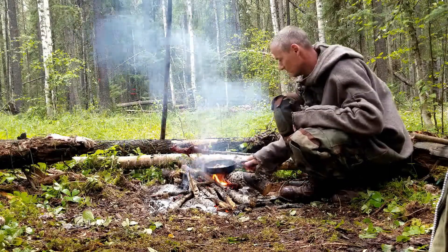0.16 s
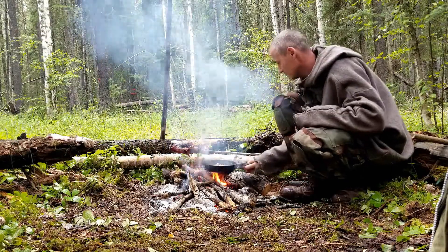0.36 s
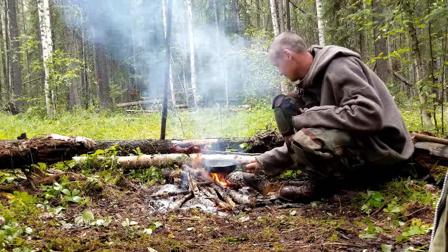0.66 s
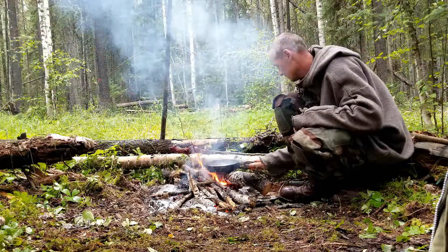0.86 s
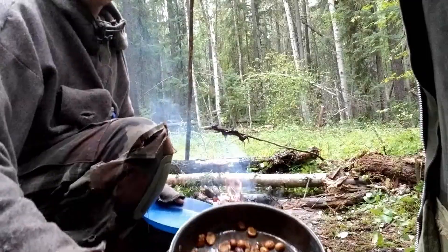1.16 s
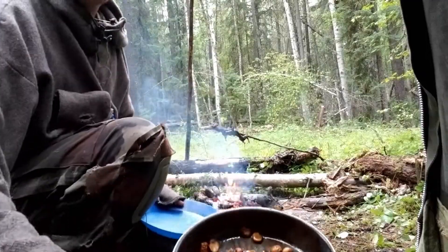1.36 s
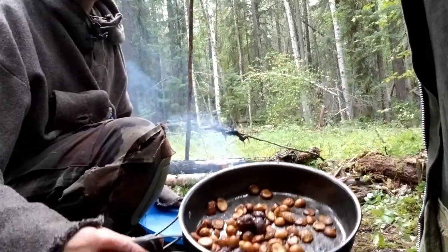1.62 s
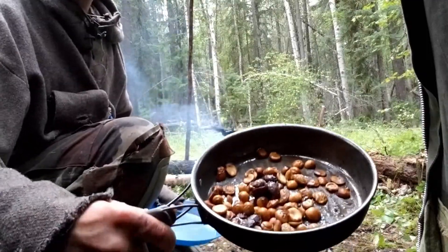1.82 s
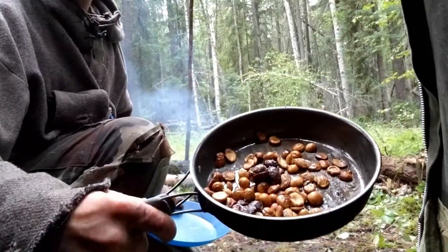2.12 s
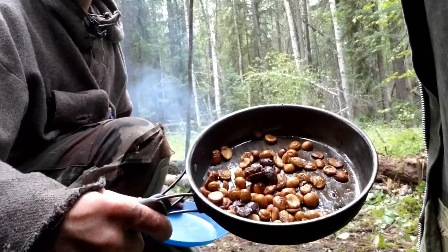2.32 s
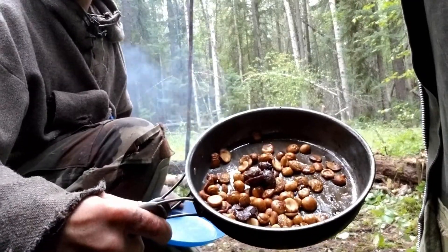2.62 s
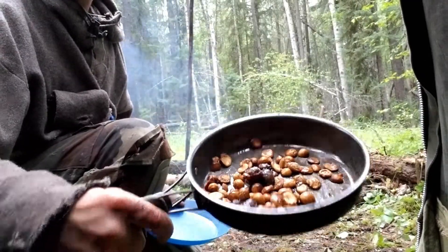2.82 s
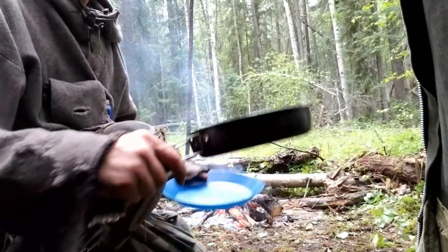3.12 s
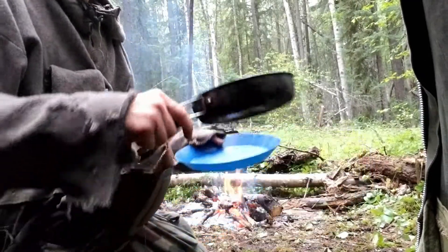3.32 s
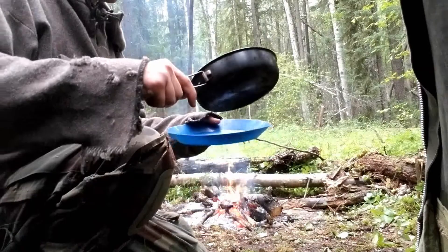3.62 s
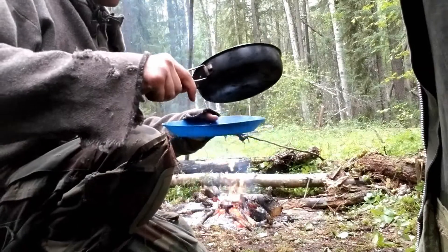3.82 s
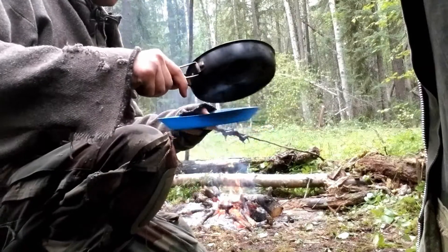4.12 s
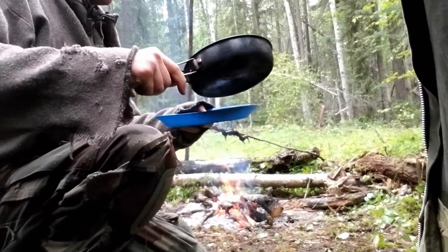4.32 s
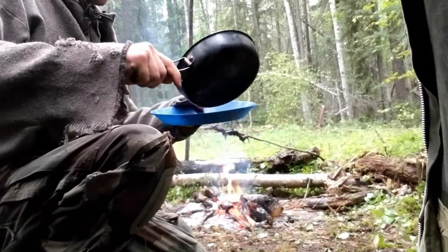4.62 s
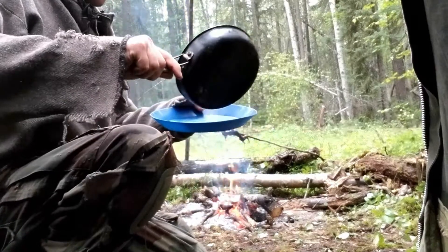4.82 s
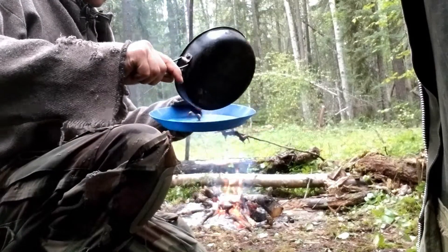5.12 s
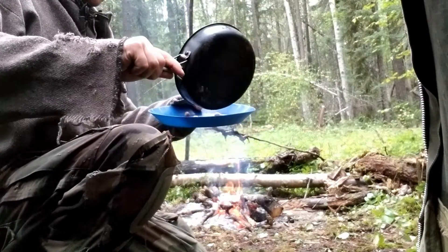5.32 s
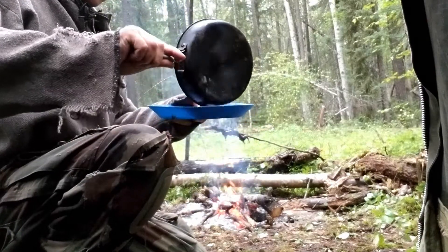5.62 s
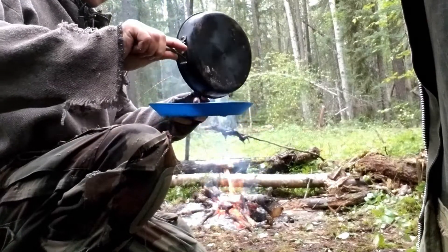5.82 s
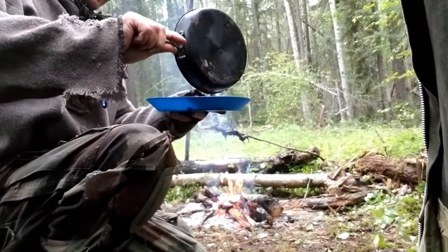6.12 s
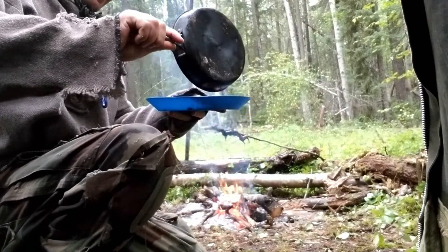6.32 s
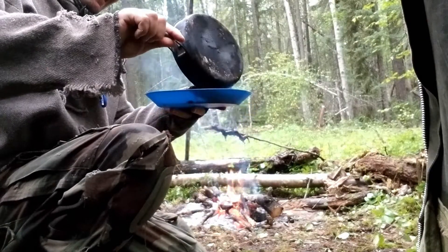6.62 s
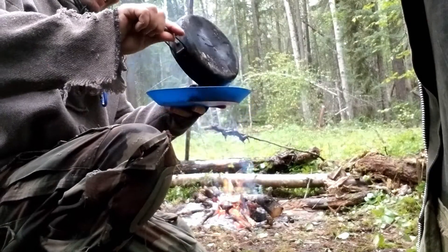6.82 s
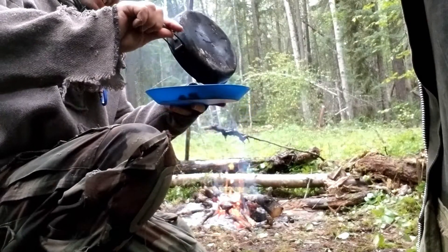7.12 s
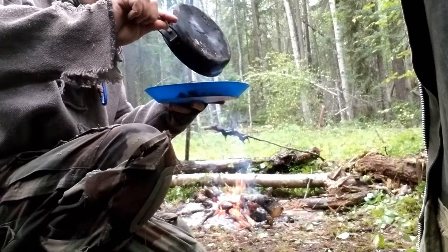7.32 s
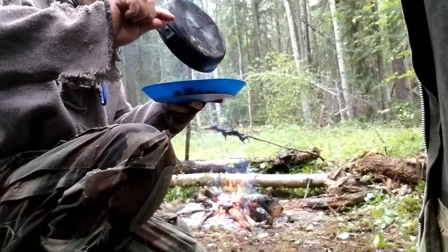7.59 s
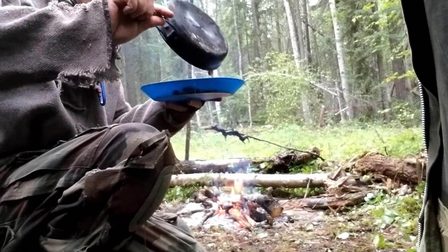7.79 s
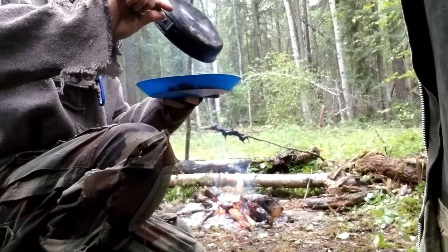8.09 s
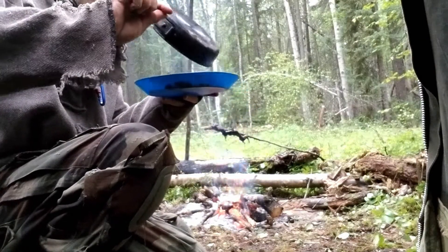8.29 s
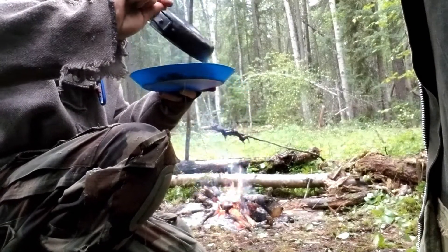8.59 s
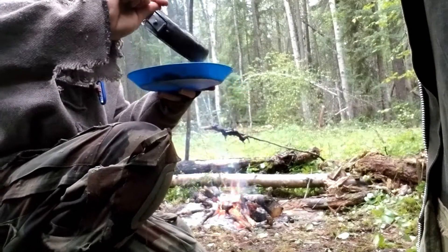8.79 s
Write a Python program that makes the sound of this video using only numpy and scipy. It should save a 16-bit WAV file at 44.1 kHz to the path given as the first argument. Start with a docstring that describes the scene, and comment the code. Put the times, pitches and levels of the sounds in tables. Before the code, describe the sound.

A campfire in a wood: low flutter, thin hiss, one loud snap at the very start. After a second the listening point jumps beside a tent, and a pan of fried mushrooms is shaken with short scraping slides. Pieces then tumble with dry knocks onto a plastic plate, thinning out while bright ember pops continue. Small stereo microphone, open air, faint pattering echoes from trees.

```python
"""Low fluttering flames and broad hiss run throughout, with sharp ember pops and pattering echoes from the start:
a campfire in a wood.
A small stereo microphone hears it from two positions; in the first, the left port is shielded from the fire.
From the second, near a tent, fried food slides in a metal pan and drops piece by piece onto a plastic plate.
Flames and hiss are shaped noise, pops are band-passed clicks, and pan and plate are resonant modes
driven by friction grains and contacts."""
import sys
import numpy as np
from scipy import signal
from scipy.fft import rfft, irfft
from scipy.io import wavfile

SR = 44100
rng = np.random.default_rng(int(sys.argv[2]) if len(sys.argv) > 2 else 0)


def master_out(mix):
    """Clip the mix to full scale and print it as 16-bit PCM to the path in sys.argv[1]."""
    frames = np.transpose(np.atleast_2d(mix))
    ceiling = np.clip(frames, -1, 1)
    pcm = np.round(ceiling * 32767).astype(np.int16)
    wavfile.write(sys.argv[1], SR, pcm)


N = 394694

MOVE_S = 1.108  # the listening position changes at once
PLATE_PAN_DB = 4  # left minus right

# metal pan modes: mode_hz, level_db, t60_s
PAN_MODES = [(622, 0, .075), (690, -10, .04), (1020, -8, .07), (1585, -11, .06), (2350, -15, .05),
             (2790, -15, .055), (3600, -19, .03), (7420, -16, .025)]
# plastic plate modes: mode_hz, level_db, t60_s
PLATE_MODES = [(466, -5, .02), (600, -4, .02), (738, -1, .025), (860, -4, .016), (1250, -3, .01),
               (1600, -4, .014), (1820, -4, .016), (2030, -5, .016), (2420, -1, .016), (2750, -2, .011),
               (3200, -3, .009), (3800, -5, .007), (4600, -6, .006)]


def amp(db):
    """Decibels to gain."""
    return 10 ** (np.asarray(db) / 20)


def rms_one(x):
    """Scale to unit rms."""
    return x / np.sqrt(np.mean(x ** 2) + 1e-20)


def peak_one(x):
    """Scale to unit peak."""
    return x / np.abs(x).max()


def in_time(rows):
    """Columns of a curve table, interpolated at every sample."""
    knot_s, *columns = np.transpose(rows)
    return [np.interp(np.arange(N) / SR, knot_s, column) for column in columns]


def sides(pan_db):
    """Left and right gains for a level difference, left minus right."""
    return amp(np.array([pan_db / 2, -pan_db / 2]))


def coloured(spectrum):
    """Two unrelated noises with the given spectrum, joint rms 1."""
    hz, level_db = np.transpose(spectrum)
    grid_hz = np.maximum(np.arange(N // 2 + 1) * SR / N, 1)
    gain = amp(np.interp(np.log(grid_hz), np.log(hz), level_db))
    white = rng.standard_normal((2, N))
    return rms_one(irfft(rfft(white) * gain, N))


def drift(knots_per_s):
    """Slow random curve through knots of standard deviation 1."""
    knots = int(N / SR * knots_per_s) + 2
    return np.interp(np.linspace(0, knots - 1, N), np.arange(knots), rng.standard_normal(knots))


def ring(x, hz, t60_s):
    """Two-pole resonator: a unit click starts a decaying sine of height about 1."""
    r, w = amp(-60 / (t60_s * SR)), 2 * np.pi * hz / SR
    return signal.lfilter([0, np.sin(w)], [1, -2 * r * np.cos(w), r * r], x + 1e-18)


def band(x, low_hz, high_hz):
    """Gentle band-pass."""
    return signal.sosfilt(signal.butter(2, [low_hz, high_hz], "band", fs=SR, output="sos"), x)


def add(out, start_s, sound):
    """Mix in a short sound, cut at the end of the scene."""
    at = int(round(start_s * SR))
    out[:, at:at + sound.shape[1]] += sound[:, :N - at]


def scatter(length, crest_s, t60_s, grain_db=1.5):
    """Envelope of many small returns: swells towards a crest, dies away, grainy."""
    t = np.arange(length) / SR
    lumps = np.repeat(rng.standard_normal((2, length // 24 + 1)), 24, axis=1)[:, :length]
    swell = .25 + .75 * (1 - np.exp(-(t / crest_s) ** 2))
    return swell * (t > .001) * amp(-60 * t / t60_s + grain_db * lumps)


def shield(s):
    """Left and right gains for direct fire sound: the left is shielded before the move."""
    shadow_db = -23
    return np.array([np.where(s < MOVE_S, amp(shadow_db), 1.), np.ones_like(s)])


def roar():
    """Flames flutter as low narrow noise, nearly the same at both ports."""
    # flames: time_s, level_db
    roar_curve = [(0.0, -49), (0.4, -55), (0.6, -49), (0.95, -54.5), (1.1, -53.5), (1.3, -53.5), (2.0, -55),
                  (2.9, -51), (2.99, -44.5), (3.09, -53), (4.76, -53.5), (4.86, -58.5), (5.0, -54),
                  (5.88, -51), (7.23, -52), (7.5, -55.5), (7.73, -52), (8.3, -51.5), (8.6, -55),
                  (8.95, -49.5)]
    # flame spectrum: freq_hz, density_db_per_hz
    roar_spectrum = [(15, -40), (30, -24), (42, -14), (57, 0), (70, -9), (82, -14), (93, -13), (106, -23),
                     (130, -24), (170, -37), (250, -37), (400, -50)]
    shared, own = coloured(roar_spectrum)
    own = band(own, 110, 400) * amp(-6.0)
    both = np.array([shared + own, shared - own]) * sides(4.1)[:, None]
    return amp(in_time(roar_curve)[0]) * both * shield(np.arange(N) / SR)


def hiss():
    """Steam from wood and fat: broad noise with faint random crackles."""
    # fire and fat at rest: time_s, level_db, lift_below_3500_hz_db
    hiss_curve = [(0.0, -61, 2), (0.17, -53.5, 2), (0.52, -57.5, -1.5), (0.68, -64, 3), (0.9, -59.5, 2),
                  (1.1, -62, -0.5), (1.35, -68.5, 4.5), (2.2, -74.5, 5.5), (2.52, -71.5, 3.5),
                  (2.62, -61.5, -6), (3.2, -63.5, 5), (3.35, -63, -3), (3.9, -69, 3.5), (4.7, -69.5, 3),
                  (5.6, -65.5, 9.5), (6.3, -67.5, 3.5), (7.3, -66, 0), (8.0, -69, 2.5), (8.12, -66.5, 6),
                  (8.47, -73, 5), (8.95, -67.5, 10)]
    # steam spectrum: freq_hz, density_db_per_hz
    hiss_spectrum = [(150, -4.5), (400, 8), (800, 8), (1600, 2), (3300, -0.5), (6000, 5), (11000, 0.5),
                     (16000, 8)]
    pan_before_db, pan_after_db = 1.5, 5.5  # left minus right, about the move
    level_db, lift_db = in_time(hiss_curve)
    # shaken fat spits
    level_db = level_db + sum(shape * rise_db for shape, (_, _, rise_db) in slide_shapes())
    pan_db = np.where(np.arange(N) / SR < MOVE_S, pan_before_db, pan_after_db)
    crackle_gain = amp(13 + 3.5 * rng.exponential(1, N).clip(0, 3))
    crackles = (rng.random(N) < 140 / SR) * crackle_gain  # 140 per second
    noise = coloured(hiss_spectrum) * amp(2.4 * drift(25))
    lift = (amp(lift_db) - 1) * band(noise, 100, 3500)
    return amp(level_db) * sides(pan_db) * (noise + lift + band(crackles, 3400, 16000))


def pops():
    """A pop is one steep click; ground, logs and cloth nearby return it as a swelling, dying patter."""
    # ember pops: start_s, treble_peak_db, body_minus_treble_db, echo_minus_pop_db, pan_left_minus_right_db
    pop_table = [(0.095, -11.5, 4, -23, -10), (0.1598, -50, 19.5, -30.5, 4), (0.4572, -55, 8, -21, 2),
                 (1.6274, -47.5, -1, -19, 24), (2.5505, -22.5, -5, -25.5, -8.5),
                 (2.696, -32, -9, -23.5, 12.5), (2.809, -41.5, -7.5, -18, 17),
                 (2.8276, -43.5, -4.5, -19, 13), (2.943, -46, -19, -17, 18), (2.9743, -34.5, -14, -28, 17),
                 (3.0959, -35, -11.5, -3.5, 27), (3.102, -32, -4.5, -28, 11),
                 (3.2396, -26, -4.5, -23, 14.5), (3.6366, -50, -6.5, -10.5, 26),
                 (3.7353, -19.5, -8.5, -32, 8.5), (4.9812, -21, -7.5, -30, 9.5),
                 (5.0648, -44, -14, -37, 15), (5.1276, -46, -5.5, -19, 12), (5.7665, -48.5, -10, -16, 16.5),
                 (5.865, -39.5, -9, -19, 20), (5.9309, -37.5, 5.5, -25, 20.5), (6.036, -46.5, -2, -9.5, 14),
                 (6.625, -40.5, -8.5, -27, 18), (6.7995, -63, 21, -21.5, 6), (6.868, -69.5, 19.5, -31, 5),
                 (6.918, -67, 12.5, -17, 1), (7.0687, -46.5, -1.5, -13.5, 20), (7.3612, -22, -6, -19, 23.5),
                 (7.5418, -48.5, -6, -31, 18), (7.7255, -45, -11, -23, 13), (7.8159, -23, -10, -27, 12),
                 (7.9013, -43.5, -10, -23, 15), (8.084, -32, -9, -28.5, 2), (8.0998, -38, -12, -24, 13),
                 (8.127, -42, -18, -17, 13), (8.177, -42.5, -10.5, -20, 13), (8.2302, -21, -4.5, -22, 18),
                 (8.342, -38, -15, -23.5, 10), (8.409, -53, -2, -19, 9), (8.646, -48, -10, -21, 12)]
    mids_at_0_db, mids_per_fainter_db, mids_per_body_db = -15, 0.23, .2  # mids minus body
    echo_pan_db = 3.5
    out, length = np.zeros((2, N)), 11000
    click = np.eye(1, 200)[0]
    treble = peak_one(band(band(click, 9500, 19000), 9500, 19000))
    body = peak_one(band(band(click, 5000, 8400), 5000, 8400))
    mids = peak_one(band(click, 1500, 4790)) + amp(-8.0) * peak_one(band(click, 316, 2200))
    for start_s, peak_db, body_db, echo_db, pan_db in pop_table:
        mids_db = mids_at_0_db - mids_per_fainter_db * peak_db + mids_per_body_db * body_db
        pop = amp(peak_db) * (treble + amp(body_db) * (body + amp(mids_db) * mids))
        near = amp(3) * scatter(length, crest_s=.008, t60_s=.1, grain_db=2.5)
        far = amp(-22.5) * scatter(length, crest_s=0.039, t60_s=0.34)  # trunks further off
        returns = amp(echo_db) * rng.standard_normal((2, length)) * (near + far)
        echo = signal.fftconvolve(returns, pop[None])
        add(out, start_s, sides(echo_pan_db)[:, None] * echo)
        direct_gains = sides(pan_db) * shield(np.float64(start_s))
        add(out, start_s, direct_gains[:, None] * pop)
    return out


def slide_shapes():
    """Each shake of the pan as a curve that swells, holds and fades, from 0 to 1 and back."""
    # food sliding: start_s, hold_s, ring_db, friction_minus_ring_db, fat_hiss_rise_db
    slide_table = [(1.1, 0.16, -59.5, 0, 10), (3.172, 0.049, -64, -3, 5), (3.394, 0.12, -59, 2.5, 3.5),
                   (3.61, .09, -53.5, -15, 6.5), (3.745, 0.031, -62.5, -31, 1),
                   (4.004, 0.075, -61, -5.5, 7), (4.127, 0.07, -55, -11.5, 10),
                   (4.241, 0.058, -57.5, -5.5, 9), (4.34, 0.057, -51.5, -14.5, 9.5),
                   (4.452, 0.064, -56.5, -8.5, 5.5), (4.853, 0.097, -61, -9.5, 3.5),
                   (4.966, 0.073, -49, -13, 1), (5.201, 0.04, -70, 15.5, 2), (5.31, 0.053, -70.5, 10, 6),
                   (5.404, 0.017, -62.5, 11, 3), (5.668, 0.25, -63.5, -3.5, -0.5),
                   (5.851, 0.068, -64, 10, 7), (6.009, 0.088, -54.5, -6.5, 10),
                   (6.145, 0.058, -59, 3.5, -1), (6.264, 0.037, -68, -3, 3), (6.553, 0.045, -66, -18, 4.5),
                   (6.75, 0.19, -71.5, 1, 0.5), (7.055, 0.076, -74, 6.5, 1), (7.267, 0.02, -74.5, 8.5, -2),
                   (8.388, 0.015, -69, 3, 7.5)]
    attack_s, release_s = 0.014, 0.083
    t = np.arange(N) / SR
    for start_s, hold_s, *levels_db in slide_table:
        corners_s = np.cumsum([0, attack_s, hold_s, release_s])
        yield np.interp(t - start_s, corners_s, [0, 1, 1, 0]), levels_db


def slides():
    """Dense uneven friction grains ring the pan; their own hiss comes with them."""
    soft_db_per_octave = 6  # soft food drives high modes less
    grain_gain = amp(3 * rng.exponential(1, N).clip(0, 4))
    grains = rng.standard_normal(N) * grain_gain * (rng.random(N) < 3000 / SR)  # 3000 per second
    grains = grains * amp(1.7 * drift(40))
    lowest_hz, metal = PAN_MODES[0][0], 0
    for k, (hz, db, t60_s) in enumerate(PAN_MODES):
        mode_db = db - soft_db_per_octave * np.log2(hz / lowest_hz)
        metal = metal + amp(mode_db) * ring(grains, hz, t60_s) * (-1) ** k
    metal = rms_one(metal)
    rub_noise = rng.standard_normal((2, N)) * amp(4.5 * drift(33))
    friction = band(rms_one(grains) * 1.2 + rub_noise, 500, 7900)
    friction = friction + amp(-3.5) * band(friction, 810, 3340)  # the rub is fullest in the mids
    ringing, rubbing = sum(shape ** 2 * amp([[ring_db], [ring_db + rub_db]])
                           for shape, (ring_db, rub_db, _) in slide_shapes())
    return sides(8.6)[:, None] * (ringing * band(metal, 810, 13000) + rubbing * rms_one(friction))


def knocks():
    """A soft piece lands as a short tumble of contacts that rings the plate, and the pan a little."""
    # food and pan touching the plate: start_s, peak_db, brightest_hz, treble_minus_peak_db, thump_minus_peak_db
    knock_table = [(2.2559, -47.5, 427, 4, -8), (2.3339, -54.5, 1470, 5, -16), (2.4763, -49.5, 585, 6, -13),
                   (2.8923, -56, 1550, -5, -9), (3.4867, -57, 623, -11, -29), (3.5066, -53, 670, -8, -30),
                   (3.6944, -55, 645, -11, -29), (4.2945, -58, 630, 0, -28), (4.3531, -66, 630, -3, -29),
                   (4.3957, -55, 610, -13, -38), (4.4865, -56, 616, 18.5, -29),
                   (4.8108, -38.5, 470, -0.5, -21), (4.9629, -52.5, 1590, 15, -21),
                   (5.0145, -50, 620, -14, -29), (5.0452, -39.5, 670, -10, -10), (5.1213, -60.5, 650, 5, 8),
                   (5.2242, -35.5, 2650, -10, -22), (5.2393, -35.5, 2500, 5.5, -21),
                   (5.2781, -29.5, 2520, 4, -35), (5.3336, -43.5, 1640, -12, -9),
                   (5.3491, -40.5, 1090, -16, -12), (5.3732, -44, 1600, -11, -24),
                   (5.3881, -40.5, 1900, -9, -29), (5.4176, -41, 750, -17, -1.5),
                   (5.4288, -30.5, 1770, -7, -23.5), (5.4585, -42, 2410, -15, -19),
                   (5.5242, -43, 800, 2, -25), (5.5992, -56.5, 830, -6, -14), (5.6852, -53, 720, -11, -3.5),
                   (5.7905, -44, 2020, 4, -19), (5.8727, -35.5, 593, -5, -12),
                   (5.9065, -34.5, 1820, -11, -23), (5.9358, -38, 1840, 16, -23),
                   (5.9956, -48, 623, 15.5, -25), (6.046, -43, 683, -3, -22), (6.0695, -31, 2500, -1, -31),
                   (6.1804, -44.5, 740, -5, -22), (6.2074, -28.5, 2350, -5, -31),
                   (6.2495, -44.5, 740, -14, -26), (6.2858, -46, 800, -15, -26),
                   (6.3121, -46.5, 583, 5, -22.5), (6.3679, -55.5, 740, -11, -25),
                   (6.45, -48.5, 880, -15, -16), (6.7249, -54.5, 650, -13, -9.5),
                   (6.7836, -53.5, 2670, 13, -25), (6.8443, -52, 830, -11, -24), (6.9034, -58, 710, -5, -9),
                   (7.0124, -64.5, 1570, 23, -2), (7.0662, -56, 730, 4, -18),
                   (7.1362, -46.5, 760, -14, -18), (7.2977, -54, 834, -6, -10),
                   (7.4051, -53.5, 740, -6, -7.5), (7.6513, -46, 3000, 5.5, -33),
                   (8.0244, -55, 2010, 1, -19), (8.6014, -43.5, 880, 9.5, -38),
                   (8.6709, -49, 755, -20, -23), (8.8241, -51, 860, 2, -33), (8.9084, -54.5, 590, -13, -23)]
    pan_ring_db = -25.5  # relative to the knock's peak
    out, length = np.zeros((2, N)), 7000
    t = np.arange(length) / SR
    for start_s, peak_db, brightest_hz, treble_db, thump_db in knock_table:
        contacts = rng.random(length) < .03
        tumble = rng.standard_normal(length) * contacts * amp(-12 - 60 * t / .06)
        tumble[0] = 1  # the first touch
        odds_db = rng.normal(0, 1.8, len(PLATE_MODES))
        signs = rng.choice([-1, 1], len(PLATE_MODES))
        plate = 0
        for (hz, db, t60_s), odd_db, sign in zip(PLATE_MODES, odds_db, signs):
            # modes near the brightest pitch are struck hardest
            mode_db = db + odd_db - 6.2 * abs(np.log2(hz / brightest_hz))
            plate = plate + amp(mode_db) * ring(tumble, hz, t60_s) * sign
        metal = sum(amp(db) * ring(tumble, hz, t60_s) for hz, db, t60_s in PAN_MODES)
        tick = amp(treble_db) * peak_one(band(tumble, 3000, 15000))
        flex = ring(tumble, 265, 0.038) + band(tumble, 250, 310) * 12  # the whole plate flexes
        thump = amp(thump_db) * peak_one(flex)
        direct = amp(peak_db) * (thump + peak_one(plate) + amp(pan_ring_db) * peak_one(metal) + tick)
        returns = amp(-27.5) * rng.standard_normal((2, 4000)) * scatter(4000, crest_s=0.0012, t60_s=0.11)
        echo = signal.fftconvolve(returns, direct[None])[:, :length]
        add(out, start_s, sides(PLATE_PAN_DB)[:, None] * (direct + echo))
    return out


def crumbs():
    """Small bits drop at random and tick on the plate, each striking the modes with its own strengths."""
    # small bits falling: time_s, level_db
    crumb_curve = [(4.75, -89), (5.25, -70.5), (6.3, -68.5), (6.6, -80.5), (7.3, -71.5), (7.6, -90),
                   (8.3, -92), (8.95, -79)]
    crumbs_per_s = 150
    falls = (rng.random(N) < crumbs_per_s / SR) * amp(3.2 * rng.exponential(1, N).clip(0, 3))
    at, out = np.flatnonzero(falls), 0
    for hz, db, t60_s in PLATE_MODES:
        clicks = np.zeros(N)
        clicks[at] = falls[at] * rng.standard_normal(len(at))
        out = out + amp(db) * ring(clicks, hz, t60_s)
    return sides(PLATE_PAN_DB)[:, None] * amp(in_time(crumb_curve)[0]) * rms_one(out)


def scene():
    """Fire, pan and plate; the steady layers stop at a lower treble limit than the impacts."""
    steady_top_hz = 15700
    steady = roar() + hiss() + slides()
    steady = signal.sosfilt(signal.ellip(10, .5, 45, steady_top_hz, fs=SR, output="sos"), steady)
    return steady + pops() + knocks() + crumbs()


def port(x, peaks):
    """A microphone port's resonances as a chain of peak and dip filters."""
    for hz, width_hz, gain_db in peaks:
        w, a = 2 * np.pi * hz / SR, amp(gain_db / 2)
        spread, middle = np.pi * width_hz / SR, -2 * np.cos(w)
        x = signal.lfilter([1 + spread * a, middle, 1 - spread * a],
                           [1 + spread / a, middle, 1 - spread / a], x)
    return x


def record(dry):
    """Each port colours the treble differently, the right hears a moment later, the top is cut."""
    # port peaks and dips: centre_hz, width_hz, gain_db
    left_peaks = [(7420, 2100, 11), (8300, 2400, -14), (12870, 5730, 7.5)]
    # same columns: centre_hz, width_hz, gain_db
    right_peaks = [(6600, 2100, 11), (7700, 6200, -16), (11690, 8000, 9), (17100, 1000, -23.5)]
    right_lag_samples, cutoff_hz = 2, 16600
    left = port(dry[0], left_peaks)
    right = port(np.roll(dry[1], right_lag_samples), right_peaks)
    top_cut = signal.ellip(10, .5, 75, cutoff_hz, fs=SR, output="sos")
    return signal.sosfilt(top_cut, np.array([left, right]))


dry = scene()
out = record(dry)
master_out(out)
```